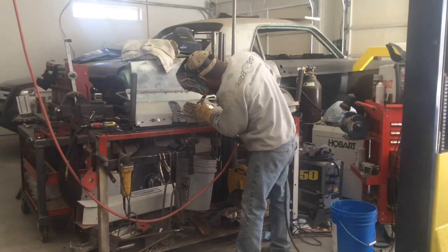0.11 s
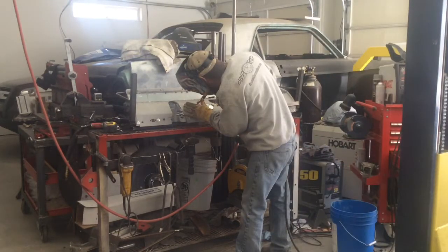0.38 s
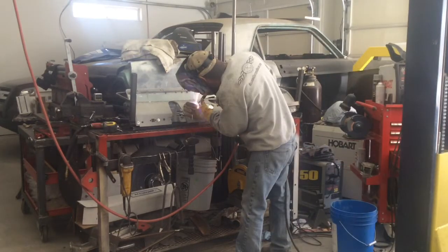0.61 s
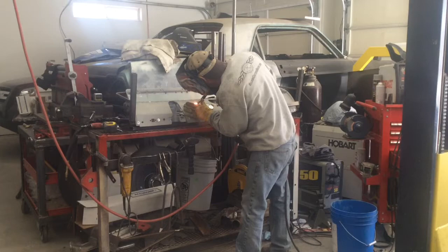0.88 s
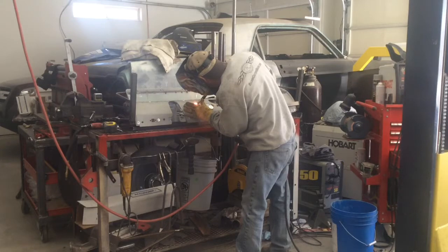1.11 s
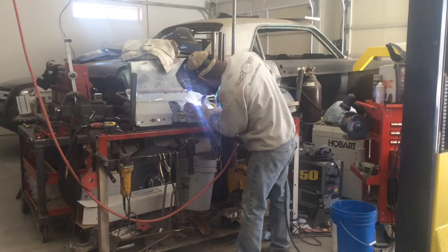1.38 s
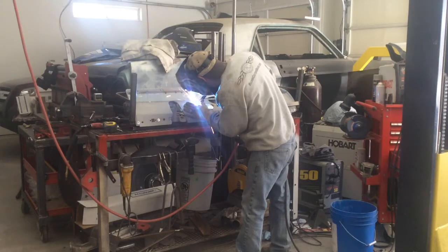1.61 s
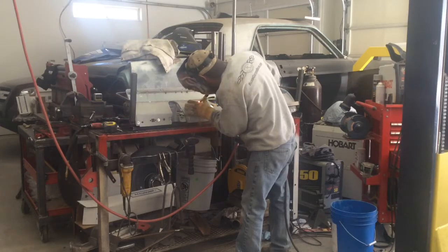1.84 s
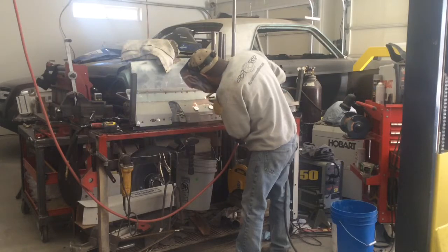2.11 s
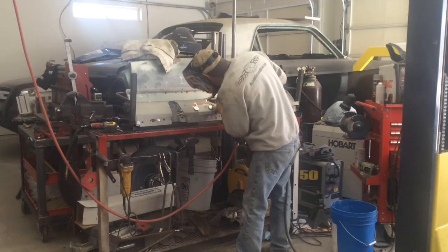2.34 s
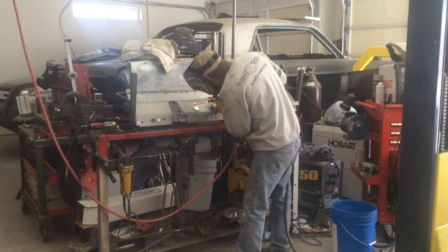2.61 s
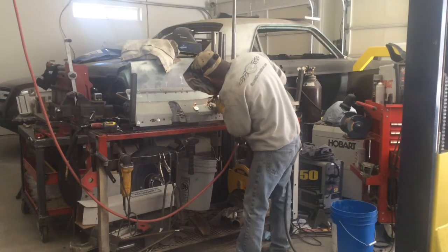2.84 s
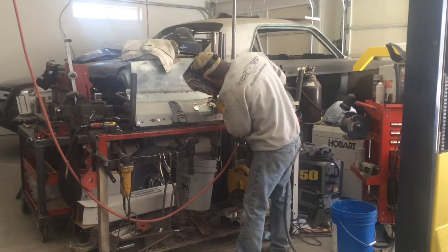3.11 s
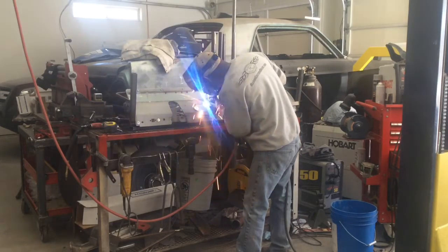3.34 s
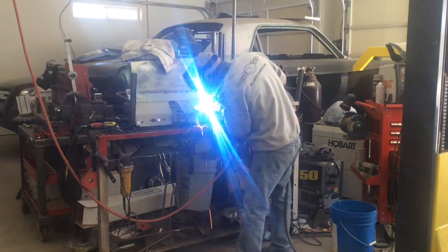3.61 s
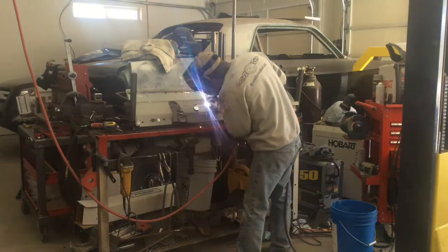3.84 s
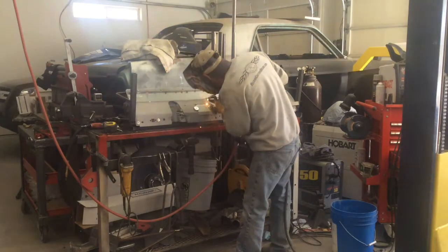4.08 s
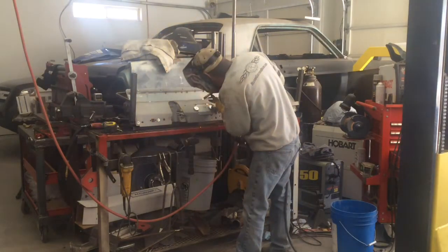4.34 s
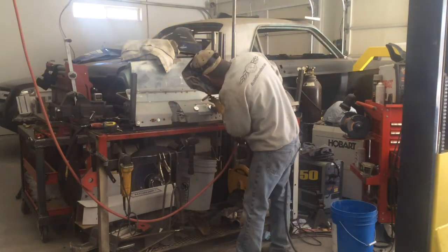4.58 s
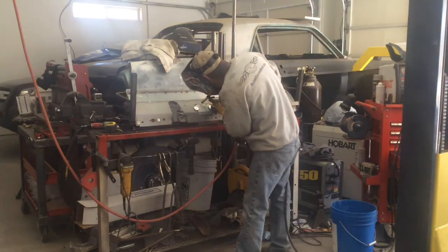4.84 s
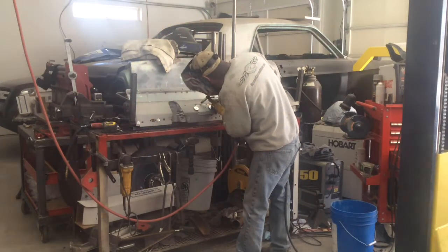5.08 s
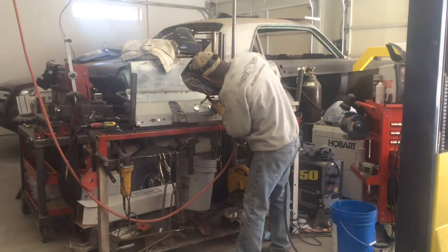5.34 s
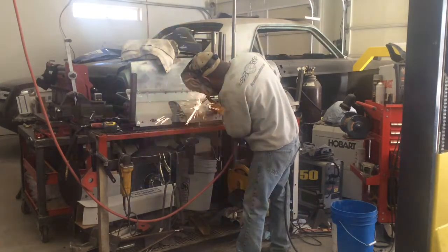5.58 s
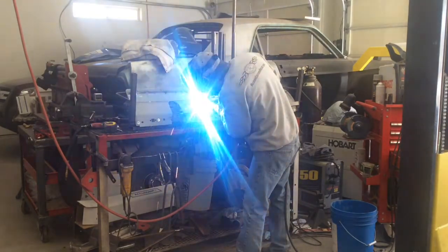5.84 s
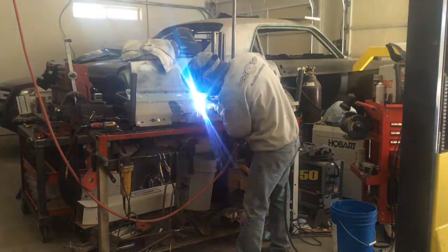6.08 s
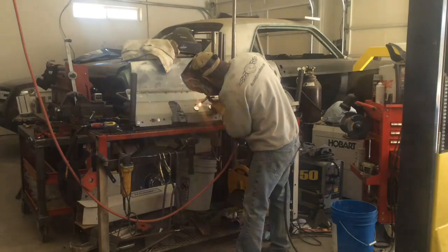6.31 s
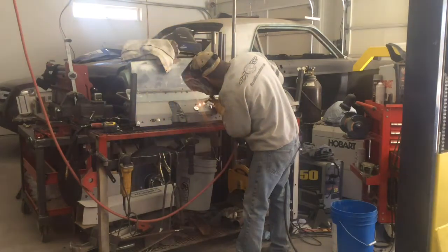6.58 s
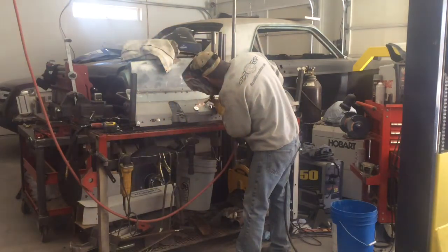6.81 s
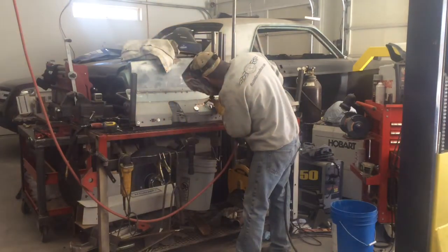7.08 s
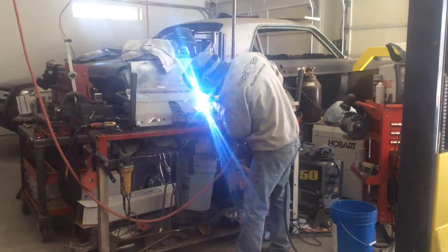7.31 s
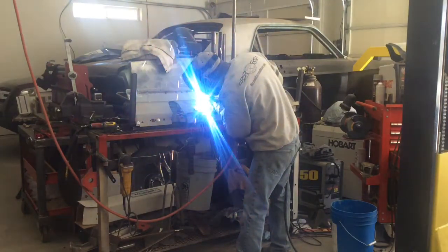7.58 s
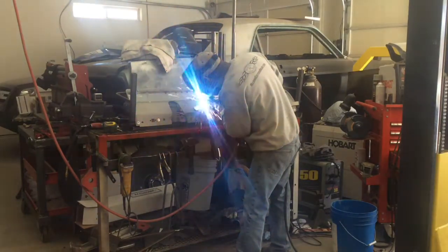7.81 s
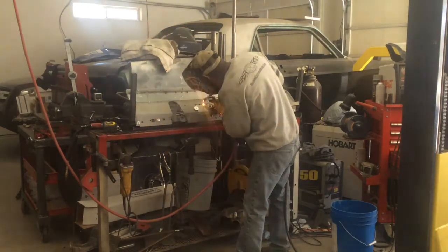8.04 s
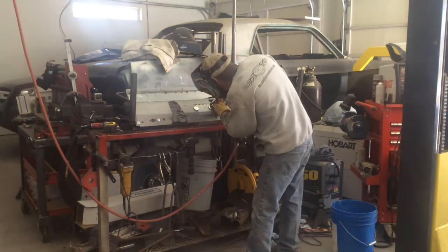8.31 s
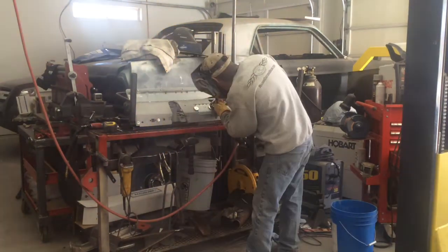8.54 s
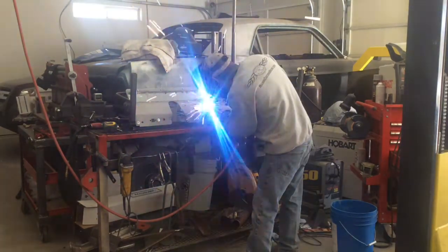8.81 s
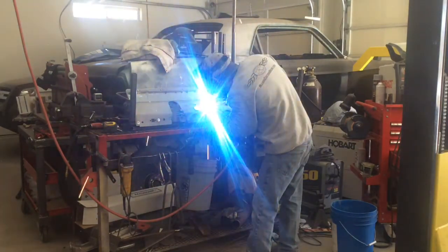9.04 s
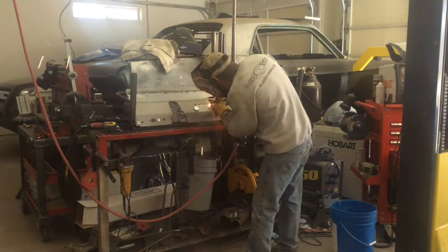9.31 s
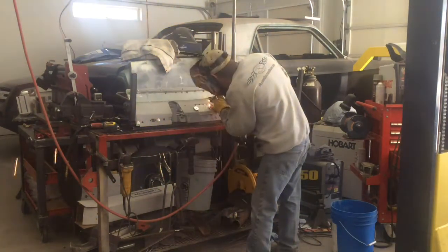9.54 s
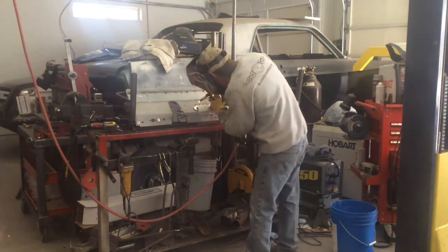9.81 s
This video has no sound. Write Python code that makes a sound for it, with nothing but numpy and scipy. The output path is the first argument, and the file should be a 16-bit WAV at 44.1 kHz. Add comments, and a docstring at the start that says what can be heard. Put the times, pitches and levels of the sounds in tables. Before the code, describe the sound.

Five short tack welds crackle and buzz sharply on thin steel, with valve clicks, gas hiss and a humming machine fan in an echoing workshop.

```python
"""Sharp, crackling pops and buzzing runs: five short tack welds on a thin steel panel in a workshop,
a few metres from the microphone. The wire shorts and re-ignites in sparks that ring panel, nozzle cup and hall.
Each weld opens a gas valve with a click, shielding gas hisses in the nozzle, and the valve ticks shut.
Low thumps come as a stubbed wire blows off, soft rustles fall between welds, and the transformer rumbles
under load. The machine's fan hums behind it all; the sound drops out once, late on."""
import sys
import numpy as np
from scipy import signal
from scipy.fft import rfft, irfft, next_fast_len
from scipy.io import wavfile
from scipy.ndimage import uniform_filter1d, map_coordinates

SR = 44100
rng = np.random.default_rng(int(sys.argv[2]) if len(sys.argv) > 2 else 0)


def materialize(psi):
    """Save the field psi as 16-bit PCM at rate SR to the path in sys.argv[1].

    A 1-D psi becomes a single channel; in a 2-D psi each row is a channel.
    """
    bounded = np.clip(np.atleast_2d(psi).T, -1, 1)
    quanta = np.round(bounded * 32767).astype(np.int16)
    wavfile.write(sys.argv[1], SR, quanta)


def makeup_ratio(level_db):
    """Linear amplitude ratio for a level in decibels (20 dB per factor of ten)."""
    decades = np.asarray(level_db, float) / 20
    return 10 ** decades


N = 437472  # samples

# the five welds: valve_opens_s, valve_shuts_s, opening_click_db, shutting_click_db (both added to
# the levels of the valve's own partials), load_hum_db (rms)
WELDS = [(0.155, 1.646, -9.5, -13.5, -33), (3.1124, 3.836, -11.5, -15, -34.5),
         (5.3868, 6.259, -12.5, -23, -32.5), (7.098, 7.916, -10.5, -20.5, -31.5),
         (8.543, 9.259, -14, -16.5, -32)]


def unit(x):
    """Scaled to rms 1."""
    return x / np.sqrt(np.mean(x ** 2) + 1e-20)


def along(points, hz):
    """(Hz, value) points read on a log frequency axis."""
    f, v = np.transpose(points)
    return np.interp(np.log(hz + 1), np.log(f + 1), v)


def wobble(rate):
    """A smooth random curve, rate knots a second."""
    knots = rng.standard_normal(int(N * rate / SR) + 4)
    return map_coordinates(knots, [np.arange(N) * rate / SR])


def filtered(x, response):
    """x times a complex response of frequency."""
    m = next_fast_len(len(x) + SR // 2)
    return irfft(rfft(x, m) * response(np.fft.rfftfreq(m, 1 / SR)), m)[:len(x)]


def causal(db):
    """Minimum-phase impulse response for levels on a 4096-point frequency grid."""
    cepstrum = irfft(np.log(makeup_ratio(db)))
    cepstrum[1:2048] *= 2  # fold the second half onto the first
    cepstrum[2049:] = 0
    return irfft(np.exp(rfft(cepstrum)))[:1024]


def noise(spectrum, patchy_db):
    """Coloured noise of rms 1 whose gain varies in patches of time and frequency."""
    z = signal.stft(rng.standard_normal(N + 512), nperseg=512)[2]
    field = uniform_filter1d(rng.standard_normal(z.shape), size=6, axis=0)
    field = uniform_filter1d(field, size=10, axis=1)
    x = signal.istft(z * makeup_ratio(patchy_db * unit(field)), nperseg=512)[1][:N]
    return unit(filtered(x, lambda hz: makeup_ratio(along(spectrum, hz))))


def while_welding(column, rise, fall):
    """A weld's value from valve open to shut, with soft edges of rise and fall seconds."""
    t = np.arange(N) / SR
    out = 0
    for (opens, shuts, *_), value in zip(WELDS, column):
        out = out + value * np.clip((t - opens) / rise, 0, 1) * np.clip((shuts - t) / fall, 0, 1)
    return out


def arc():
    """Each pop is one sharp spark and a short flurry of smaller ones in the panel's modes, then the cup's ring."""
    # lone pops while the arc stutters: start_s, level_db (before the shared lift), length_ms
    lone = [(.231, 0, 1.5), (.2644, 6.5, 3.2), (.4587, 5, 4), (.6177, 2, 4.6), (.7426, 0.5, 4.5),
            (.7488, -10.5, 1.3), (.8643, -1.5, 6.8), (.9765, 6, 3), (.9941, -9.5, 2.9), (1.0727, 2.5, 3.5),
            (1.154, -2, 4.9), (1.1598, -0.5, 3), (1.214, -6, 1.4), (1.222, 1, 6.1), (1.2325, -1, 1.7),
            (1.258, 7, 4), (1.3155, -4, 3.9), (1.4764, -2, 3.1), (1.4888, -3, 3.3), (1.5062, -2.5, 4.1),
            (1.6058, -2.5, 3.4), (1.6247, -3.5, 3.9), (3.185, 4.5, 3.4), (3.204, -7, 1.4), (3.2092, 2, 2.9),
            (3.2668, 2.5, 2.7), (3.2729, -0.5, 3.5), (3.3182, 1, 4), (3.3613, 0, 3.2), (3.418, -1, 2.1),
            (5.4877, -3, 3.3), (5.4993, -4, 1.1), (5.549, -2, 2.7), (5.578, -8.5, 2.3), (5.625, 5.5, 2.2),
            (5.8269, 2.5, 1.6), (5.9407, -2, 1.4), (5.9548, 1, 2.1), (6.0041, -1.5, 3.5),
            (6.039, -5.5, 3.5), (6.055, -0.5, 3.2), (6.2515, -8, 1.5), (7.1613, 3.5, 4.3),
            (7.2347, -4, 2.1), (7.243, 1, 2.8), (7.287, -4, 3.2), (7.4307, -1.5, 3.4), (7.557, -2.5, 2.6),
            (7.6717, -4.5, 2.9), (7.83, -2, 3.3), (7.8483, 0, 1.8), (7.8672, -2.5, 4.7), (7.8927, -3, 1.8),
            (8.6411, 1.5, 1.7), (8.6443, -2.5, 1.2), (8.6811, 1, 7.6), (8.7527, 6, 2.5), (8.883, -5.5, 3.7),
            (8.8923, -1, 1.8), (8.933, -5, 3.5), (8.9923, 0, 1.6), (9.0672, -1.5, 1.9), (9.0826, -2.5, 4.3),
            (9.094, -1.5, 3.1)]
    # panel modes, struck differently at each weld's spot: mode_hz, width_hz, then boost_db at welds 1 to 5
    modes = np.array([(392, 690, 3, 0, 4, 3.5, 0.5), (1057, 140, 10, -1, 1.5, -2, 2),
                      (1490, 230, 13.5, 5, 5.5, 7, 4), (2220, 380, 3, 3, 3, 5, 6),
                      (3156, 370, 4, 6.5, 6, 8, 1.5), (4200, 250, 4, 7, 1, 0.5, 1.5),
                      (5070, 490, 5, 1, 1.5, 2.5, 3.5), (6100, 210, 2, 3.5, 2.5, -0.5, 4),
                      (6940, 400, 3, 0, -4, -3.5, 3.5), (10750, 530, 2, 2, 2.5, 4.5, 1),
                      (13700, 500, -6, 3, -2.5, 0.5, -4)])
    # colour of the arc under those modes: freq_hz, density_db (relative)
    colour = [(60, -30.5), (200, -2.5), (700, -3.5), (1200, -11), (2500, -7.5), (4800, -4.5), (6500, -5.5),
              (8500, -12), (12500, -18), (16000, -20)]
    lift_db = 4.0
    buzz = buzz_pops()
    s, db, ms = np.transpose(np.concatenate([lone, buzz]))[:, :, None]
    t = np.arange(1024) / SR

    chance, size = rng.random((len(s), len(t))), rng.standard_normal((len(s), len(t)))
    struck = chance < 5000 / SR  # about 5000 small sparks a second
    age = np.maximum(t * 1000 - .2, 0) / np.maximum(ms - .7, .1)
    flurry = struck * size * makeup_ratio(-4.0 - 5.3 * age ** 2.36)
    fizz = size * makeup_ratio(-23 - 60 * t / 0.054)
    full_flurry_ms = 2.1  # shorter pops are mostly the one spark
    first_spark = -(t == 0).astype(float)
    sparks = np.clip(ms / full_flurry_ms, 0, 1) * (flurry + fizz) + first_spark

    hz = np.fft.rfftfreq(4096, 1 / SR)
    bumps = np.exp(-((hz - modes[:, :1]) / modes[:, 1:2]) ** 2)
    levels = along(colour, hz) + modes[:, 2:].T @ bumps
    rings = np.array([causal(level) for level in levels])
    weld = np.searchsorted(np.array(WELDS)[:, 0], s[:, 0]) - 1
    pops = signal.fftconvolve(sparks, rings[weld], axes=1)
    pops /= np.abs(pops).max(axis=1, keepdims=True)

    # the nozzle cup rings as the arc relights
    ring_hz, ring_t60_s, ring_delay_s = 4820, 0.0032, 0.0003025
    lone_ring_db, buzz_ring_db = -5.5, -1.0  # over the pop's peak
    late, detune, loud = rng.standard_normal((len(s), 3)).T[:, :, None]
    since = np.maximum(t - ring_delay_s * (1 + .12 * late), 0)
    ring_db = np.repeat([lone_ring_db, buzz_ring_db], [len(lone), len(buzz)])[:, None] + 1.5 * loud
    cup = makeup_ratio(ring_db - 60 * since / ring_t60_s)
    cup = cup * np.sin(2 * np.pi * ring_hz * (1 + 0.036 * detune) * since)

    def placed(x):
        """Adds every row at its start time."""
        index = np.round(s * SR).astype(int) + np.arange(x.shape[1])
        return np.bincount(index.ravel(), x.ravel(), N)[:N]

    gain = makeup_ratio(db + lift_db)
    return placed(gain * pops), placed(gain * cup)


def buzz_pops():
    """Rows (start_s, level_db, length_ms) of evenly paced short-circuit pops, each after the wire's touch."""
    # steady runs, the wire shorting at an even pace: first_pop_s, last_pop_s, pop_count, level_db (before lift)
    runs = [(1.3326, 1.3416, 2, 0.5), (1.3473, 1.3675, 4, 1.5), (1.374, 1.3984, 4, 2),
            (1.4026, 1.4154, 3, -4), (1.4209, 1.4665, 7, -1), (1.5185, 1.5902, 11, -0.5),
            (3.4265, 3.4546, 3, 0.5), (3.469, 3.5105, 4, -2), (3.5223, 3.549, 4, 0),
            (3.561, 3.5803, 3, -2.5), (3.5881, 3.6437, 8, -2.5), (3.6513, 3.689, 7, -3),
            (3.695, 3.713, 4, -2), (3.7183, 3.738, 5, -3), (3.7474, 3.7906, 6, -2.5),
            (3.8063, 3.8104, 2, -4.5), (5.677, 5.7054, 4, -2.5), (5.7573, 5.7817, 5, -1),
            (5.8414, 5.8741, 6, 1), (5.8875, 5.892, 2, -2), (5.909, 5.92, 3, -1), (5.9688, 5.9933, 5, -2),
            (6.017, 6.0235, 2, -1.5), (6.1068, 6.1224, 3, -2), (6.1403, 6.1632, 4, -2.5),
            (6.1747, 6.195, 3, -3.5), (7.3274, 7.3833, 5, -0.5), (7.4713, 7.484, 2, 0.5),
            (7.5028, 7.515, 3, 1.5), (7.599, 7.635, 6, 0.5), (7.645, 7.657, 3, -1.5),
            (7.7208, 7.7565, 6, -1), (7.765, 7.7912, 4, -1), (8.7976, 8.8462, 5, 0),
            (8.9495, 8.9791, 4, -0.5), (9.0094, 9.0324, 4, -2), (9.112, 9.124, 2, -7),
            (9.14, 9.1582, 3, -4), (9.1754, 9.232, 5, -4)]
    jitter, scatter_db = .05, 0.75  # timing spread as a share of the gap; level spread
    base_ms, ms_per_gap_ms = 0.73, .12  # a longer wait grows a bigger drop and a longer pop
    # the wire ticks on the pool just before a pop
    touch_lead_s, touch_spread, touch_ms = .0021, .15, .75
    touch_db, fade_db_per_ms = 2.5, 1.28  # the slower the pace, the fainter the touch
    first_touch_db = -8.5  # a run's first pop strikes cold, with hardly a touch
    rows = []
    for first, last, count, db in runs:
        place = np.arange(round(count))
        gap = (last - first) / place[-1]
        chance = rng.standard_normal((len(place), 4))
        inner = (place > 0) * (place < place[-1])  # the ends of a run keep their times
        s = first + gap * (place + jitter * inner * chance[:, 0])
        length = base_ms + ms_per_gap_ms * gap * 1000 + 0 * s
        rows.append(np.transpose([s, db + scatter_db * chance[:, 1], length]))
        touch_s = s - touch_lead_s * np.exp(touch_spread * chance[:, 2])
        level = db + touch_db + first_touch_db * (place == 0)
        level = level - fade_db_per_ms * gap * 1000 + 1.6 * chance[:, 3]
        rows.append(np.transpose([touch_s, level, touch_ms + 0 * s]))
    return np.concatenate(rows)


def gas():
    """The valve clicks open and shut; between, gas rushes through the nozzle's resonances."""
    # gas flow and arc fizz, one list a weld: time_s, level_db (rms)
    flow_points = [
        [(0.15, -29), (1.66, -39.5)],
        [(3.11, -23), (3.84, -26.5)],
        [(5.385, -22.5), (6.28, -33.5)],
        [(7.09, -21), (7.93, -34.5)],
        [(8.54, -30), (9.28, -26.5)],
    ]
    # nozzle colour: freq_hz, density_db (relative)
    nozzle = [(530, -48.5), (900, -12.5), (1100, -9.5), (1660, -4.5), (2730, -17.5), (3640, -13.5),
              (5280, 0), (7680, -13.5), (11800, -24), (15100, -34.5), (16000, -64.5)]
    # the valve's body and tick: pitch_hz, level_db (relative to the click level), t60_s
    valve = [(333, 4, 0.015), (1630, -1, 0.0061)]
    s, db = np.transpose(np.concatenate(flow_points))
    flow = makeup_ratio(np.interp(np.arange(N) / SR, s, db))
    gate = while_welding(np.ones(len(WELDS)), rise=.013, fall=.02)
    out = gate * flow * noise(nozzle, patchy_db=.7)
    t = np.arange(SR // 20) / SR
    body, tick = (makeup_ratio(db - 60 * t / t60) * np.sin(2 * np.pi * hz * t) for hz, db, t60 in valve)
    for opens, shuts, open_db, shut_db, _ in WELDS:
        out[round(opens * SR):][:len(t)] += makeup_ratio(open_db) * (body + tick)
        out[round(shuts * SR):][:len(t)] += makeup_ratio(shut_db + 5) * tick  # the tick alone, 5 dB up
    return out


def thumps():
    """A stubbed wire blows off: a short drop of pressure, rounded off and let down by the microphone's low cut."""
    # start_s, level_db (before the filter), length_ms
    blow_offs = [(3.184, -2, 4.2), (5.487, -2.5, 6), (5.55, 0.5, 5.9), (5.624, 1, 1.2), (7.184, -3.5, 7),
                 (8.6447, -5.5, 1.1), (8.6825, -3, 1.3), (9.015, -6, 1)]
    t = np.arange(N) / SR
    push = -sum(makeup_ratio(db) * ((t > s) & (t < s + ms / 1000)) for s, db, ms in blow_offs)
    cut_hz, round_hz = 14, 260
    return filtered(push, lambda f: (1j * f / (cut_hz + 1j * f)) ** 2 * round_hz / (round_hz + 1j * f))


def rustles():
    """Soft brushes of broad treble noise under bell-shaped swells."""
    # faint rustles between welds: centre_s, level_db (rms at the crest), length_s (crest to 1/e)
    brushes = [(2.35, -52.5, 0.055), (3.0, -61.5, .03), (8.278, -51.5, 0.00593)]
    t = np.arange(N) / SR
    swell = sum(makeup_ratio(db) * np.exp(-((t - s) / length) ** 2) for s, db, length in brushes)
    return swell * noise([(800, -30), (2000, -5), (6000, -5), (9000, -29.0)], patchy_db=3.0)


def transformer():
    """The transformer rumbles under load: low noise that lasts as long as each weld."""
    # rumble colour: freq_hz, density_db (relative)
    colour = [(15, -43.5), (40, -6.5), (80, -0.5), (150, 1.5), (350, -6.5), (700, -5.5), (1200, -37.5)]
    load = while_welding(makeup_ratio(np.array(WELDS)[:, 4]), rise=.1, fall=0.047)
    return load * noise(colour, patchy_db=1.5)


def fan():
    """Air rush as coloured noise, with narrow hum lines unsteady in pitch and level."""
    # rush colour: freq_hz, density_db (relative)
    colour = [(12, -69), (20, -24), (86, -14.5), (113, -7), (146, -17.5), (163, -6.5), (222, -2.5),
              (499, -11.5), (558, -14), (678, -13.5), (976, -24), (1440, -25), (3530, -40.5),
              (14700, -50.5), (16000, -66.5)]
    # hum lines: pitch_hz, level_db (3 dB is added below), wander_hz
    lines = [(119.3, -50.5, 3), (178.6, -50, 6), (218.7, -39.5, 9.1), (263.6, -44.5, 6), (653, -47.5, 6.05),
             (690, -50, 5.2), (940, -56, 3), (1132, -56.5, 4)]
    out = makeup_ratio(-32 + 0.28 * wobble(4)) * noise(colour, patchy_db=1.52)
    t = np.arange(N) / SR
    for hz, db, wander in lines:
        level = makeup_ratio(db + 3 + 2.9 * wobble(9))
        cycles = hz * t + np.cumsum(wander * wobble(15)) / SR
        out = out + level * np.sin(2 * np.pi * cycles)
    return out


def hall(x):
    """The workshop's tail, drawn anew for each slice of sound; each frequency dies at its own speed."""
    # decay of the room: freq_hz, t60_s
    decay = [(200, 0.64), (1300, 0.4), (4000, 0.52), (9000, 0.38), (15000, .3)]
    out, step = np.zeros(N + 2 * SR), SR // 8
    for start in range(0, N, step):
        part = x[start:start + step]
        hz, t, z = signal.stft(rng.standard_normal(SR * 3 // 4), SR, nperseg=256)
        if np.abs(part).max() > 1e-4:  # near-silent slices get no tail
            fade = makeup_ratio(-60 * t / along(decay, hz)[:, None])
            tail = signal.istft(z * fade, SR, nperseg=256)[1]
            wet = signal.fftconvolve(part, tail / np.linalg.norm(tail))
            out[start + SR // 200:][:len(wet)] += wet  # 5 ms after the direct sound
    return out[:N]


def scene():
    """Torch sounds, direct and through the hall, with thumps and rustles over the transformer and fan."""
    sparks, cup = arc()
    hiss = gas()
    cup_to_walls = .4  # the cup beams its ring forward: share that reaches the walls
    wet = hall(makeup_ratio(-11.5) * (sparks + cup_to_walls * cup) + makeup_ratio(-12) * hiss)
    return (sparks + cup + hiss + wet + thumps() + rustles() + transformer() + fan())[None]


def roll_off(x):
    """The treble ends steeply here."""
    return signal.sosfilt(signal.butter(12, 16460, fs=SR, output="sos"), x)


def record(dry):
    """Soft clipping near full scale, one dropout with a faded return, and the band limit."""
    # the gap: silent_from_s, back_at_s, fade_in_s
    gap = (8.207, 8.241, 0.033)
    x = dry / (1 + np.abs(dry / .98) ** 4) ** (1 / 4)
    off, on, fade = gap
    t = np.arange(N) / SR
    x = x * np.where(t < off, 1, np.clip((t - on) / fade, 0, 1))
    top_hz, edge_hz = 15400, 16400  # a weak band is left between the two, nothing above
    x = filtered(x[0], lambda hz: np.where(hz < top_hz, 1, makeup_ratio(-42.5) * (hz < edge_hz)))[None]
    return roll_off(x)


dry = scene()
out = record(dry)
materialize(out)
```